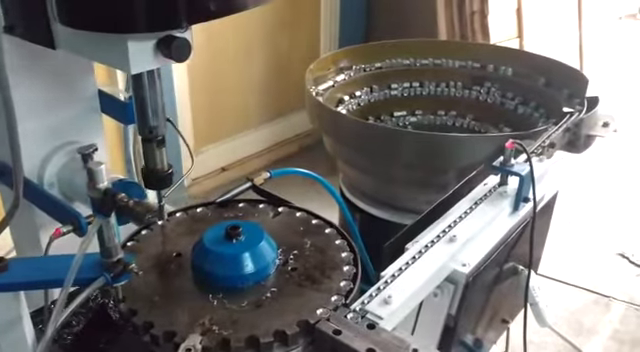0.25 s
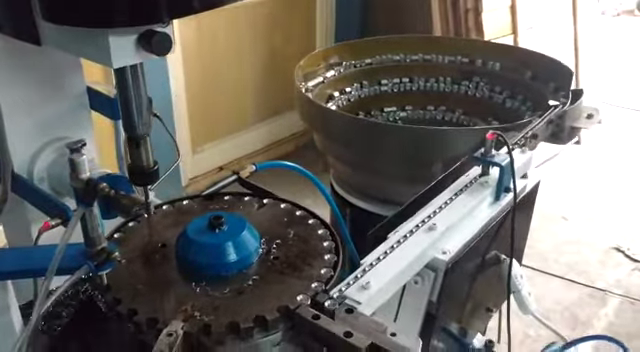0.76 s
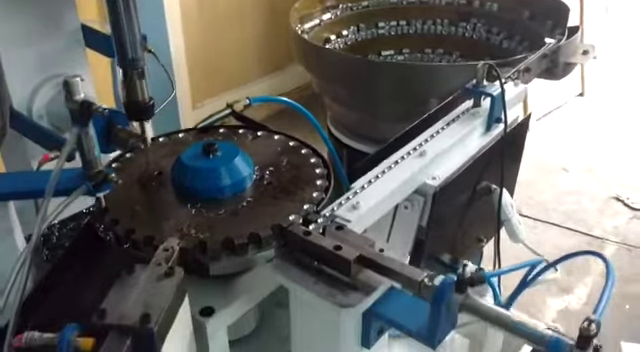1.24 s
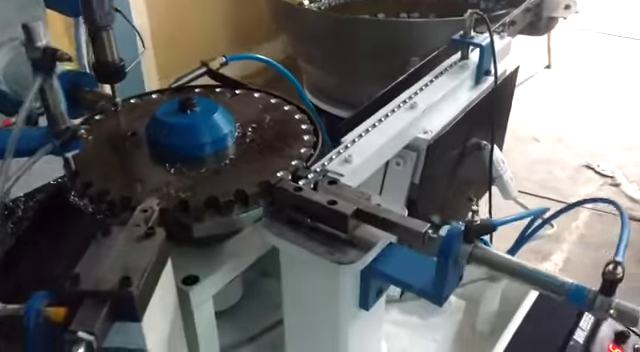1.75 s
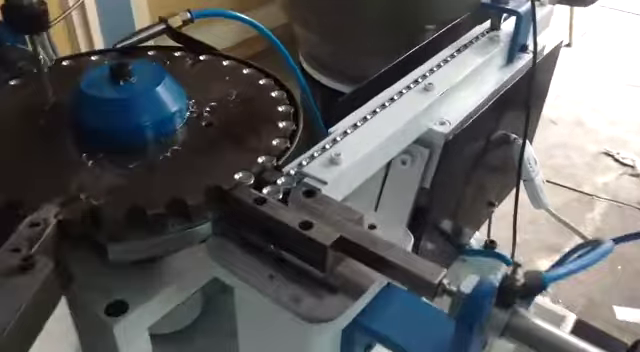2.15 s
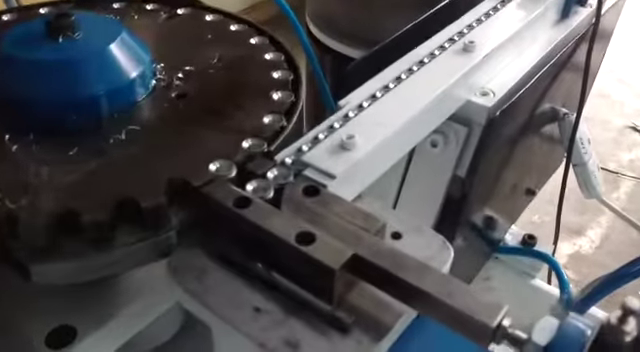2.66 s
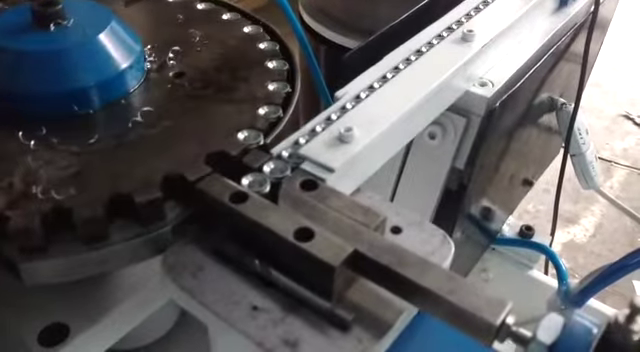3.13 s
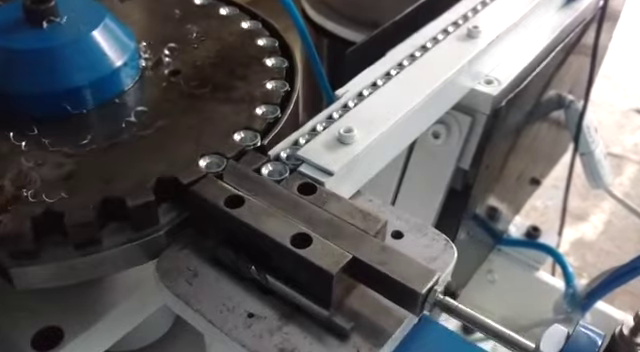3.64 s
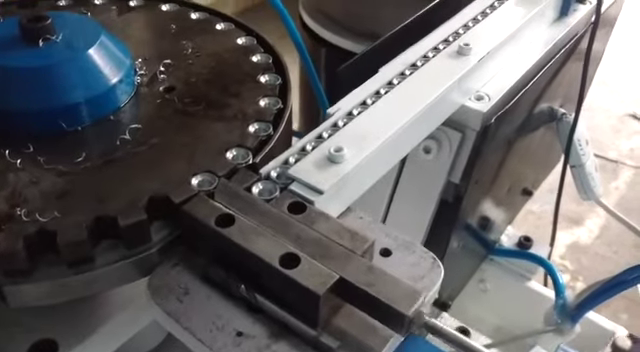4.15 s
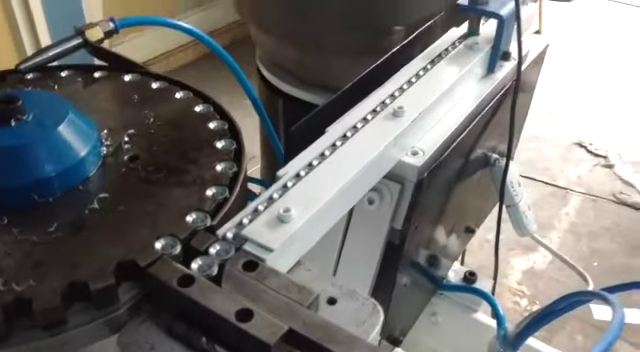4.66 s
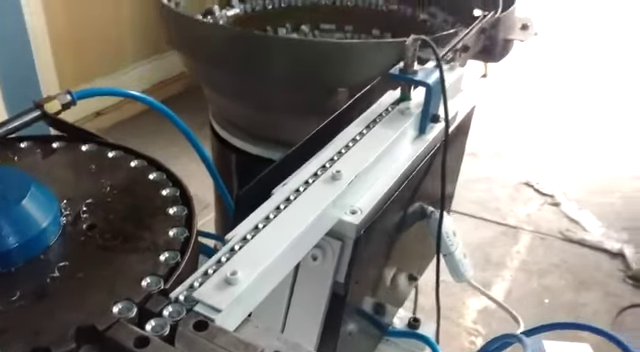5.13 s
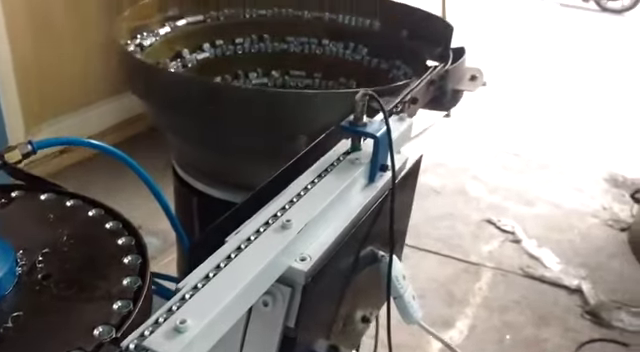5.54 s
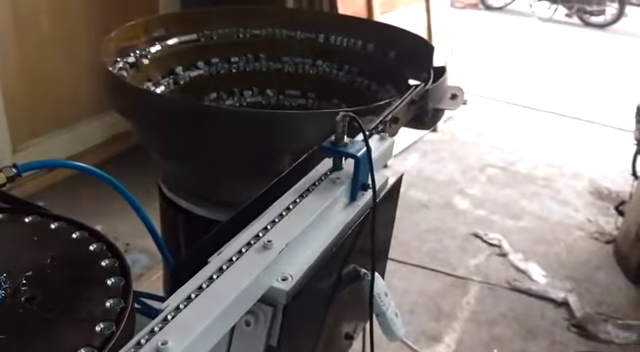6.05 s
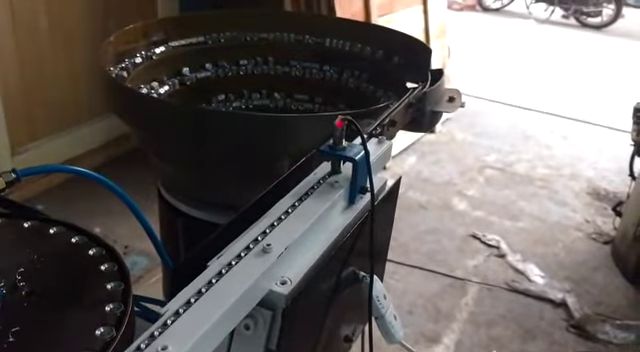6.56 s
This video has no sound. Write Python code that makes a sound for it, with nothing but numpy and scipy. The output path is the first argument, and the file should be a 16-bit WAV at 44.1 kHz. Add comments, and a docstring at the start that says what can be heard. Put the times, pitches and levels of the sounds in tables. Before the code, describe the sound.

Close in a small hard workshop, a drill growls through metal in two swelling passes over a limping belt thump and the bright rattle of tiny steel parts. Each pass ends abruptly with a sharp clack and an air hiss. Between them the index table turns, pneumatic valves spit, slides knock and a locking pin rings briefly.

```python
"""A drill grinds through metal in an automatic machine, over two cycles heard in a workshop from close by.
Broken chips excite its frame; the grinding swells and dies as it lifts. A vibrating bowl feeder hums and
rattles small steel parts: random impacts through resonances. A drive belt thumps in a limping rhythm,
air valves spit shaped noise, the slide and index table clack against stops, and a pin rings in decaying modes."""
import sys
import numpy as np
from scipy import signal
from scipy.fft import rfft, irfft, next_fast_len
from scipy.io import wavfile
from scipy.ndimage import uniform_filter1d, minimum_filter1d, map_coordinates

SR = 44100
rng = np.random.default_rng(int(sys.argv[2]) if len(sys.argv) > 2 else 0)


def waveform_to_disk(signal):
    """Save audio, clipped to [-1, 1], as 16-bit WAV at the path in sys.argv[1]."""
    frames = np.transpose(np.atleast_2d(signal))
    scaled = np.clip(frames, -1, 1) * 32767
    samples = np.round(scaled).astype(np.int16)
    wavfile.write(sys.argv[1], SR, samples)


N = 299880

# Levels in these tables are relative settings; the sources add their own trims.
# The machine at rest, read between rows. Each row: time in s, grinding in dB, rattle in dB.
IDLE = [(0.4, -40.5, -41), (2.85, -38, -37.5), (3.85, -37, -36.5), (4.05, -35, -33.5), (6.35, -37.5, -36)]
# The bit feeds into a part, reaches full load and lifts.
# Each row: start in s, lift in s, time to full load in s, grinding in dB, rattle in dB.
CUTS = [(0.683, 2.451, 1.437, -24.5, -25.5), (4.19, 5.956, 1.073, -26, -25.5)]
# The table is pushed round to its next stop.
# Each row: start in s, stop in s, time to full speed in s, grinding in dB, rattle in dB.
TURNS = [(-0.5, 0.115, 0.4, -32, -32), (2.997, 3.615, 0.73, -31.5, -30), (6.486, 7.115, 0.61, -29, -29.5)]
# Every stroke eases in, swells steadily and dies fast; the rattle is full a little before the grinding.
EASE_S, RATTLE_LEAD_S = 0.12, 0.1
SWELL_DB_PER_S, GRIND_FALL_DB_PER_S, RATTLE_FALL_DB_PER_S = 12, 800, 85
CYCLE_S = 3.5
# In the second cycle the timed vents and stops are louder, and more so in their sizzle and knocks.
SECOND_CYCLE_DB, SECOND_CYCLE_COLOUR_DB = 1.5, 2

# Colour of the rattling parts. Each row: frequency in Hz, gain in dB.
RATTLE_COLOUR = [(300, -25), (1500, -19.5), (2400, -11.5), (3100, -3), (3900, 1), (5000, -0.5), (6300, -3),
                 (7800, -7.5), (11000, -12.5), (13000, -16), (15000, -36)]
# Resonances of the small parts. Each row: frequency in Hz, width in Hz, gain in dB.
PART_MODES = [(3100, 8.4, -3.5), (3534, 48, -3), (3890, 18, -1.5), (4020, 18, -9), (6160, 50, -12)]
# Colour of the cut. Each row: frequency in Hz, gain in dB.
GRIND_COLOUR = [(25, -54), (60, -38), (100, -24.5), (170, -10), (270, -11), (380, -2), (480, -5), (700, -1),
                (1300, 0), (1900, -2), (2400, -7), (5000, -11), (12000, -71)]
# Colour of the low growl under the cut. Each row: frequency in Hz, gain in dB.
GROWL_COLOUR = [(25, -62), (70, -14), (130, -9), (200, -8), (270, -1), (380, -3.5), (500, 2), (800, -4.5),
                (2000, -53)]
# Resonances of the machine frame. Each row: frequency in Hz, width in Hz, gain in dB.
FRAME_MODES = [(281, 34, 3.5), (348.6, 11, 2), (413.2, 6.1, 4), (726, 27, -8.5), (1255, 42, -20),
               (1745, 25, -9)]
# Hum of the drill motor, relative to the grinding. Each row: frequency in Hz, level in dB.
MOTOR_HUM = [(150, -28.5), (291, -17.5), (414.5, -14.5), (528, -18.5), (550, -18.5), (600, -22),
             (649, -16.5), (729, -29.5)]
# Hum of the feeder magnet, whatever the load. Each row: frequency in Hz, mean level in dB.
MAGNET_HUM = [(50, -68), (100, -72), (150, -62.5), (200, -63), (350, -49), (550, -58.5), (600, -55)]
BELT_TURN_S = 0.16038
# Uneven spots of the drive belt meet the pulley once a turn.
# Each row: thump's peak in s into the turn, level over the grinding in dB, length in s.
BELT_SPOTS = [(0.015, -9.5, 0.014), (0.037, 2, 0.022), (0.068, -6.5, 0.018), (0.086, -5, 0.014),
              (0.111, -1, 0.021)]
# Modes of the housing in a belt thump. Each row: nominal frequency in Hz, level in dB.
HOUSING_MODES = [(135, -21.5), (295, -9), (392, 1.5), (560, -7.5)]

# Air valves venting in every cycle.
# Each row: time into the cycle in s, level in dB, sizzle in dB, t60 in s, opening time constant in s.
VENTS = [(0.114, -11, -17, 0.28, 0.0087), (0.716, -13, -18.5, 0.29, 0.0095),
         (2.719, -20.5, -13, 0.38, 0.0019), (3.315, -14, -17, 0.18, 0.01)]
# The exhaust that lifts the drill. One row: sizzle in dB, t60 in s, opening time constant in s.
LIFT_VENT = (-21, 0.48, 0.27)
# Strength of that exhaust. Each entry: level in dB, one for each cut.
LIFT_VENT_LEVELS = [-6.5, -4]
# Colour of the air jets. Each row: frequency in Hz, gain in dB.
AIR_COLOUR = [(30, -58), (150, -11), (400, -7), (2200, -5), (3200, -1.5), (4500, 7), (6200, 5), (7500, 2),
              (9500, -6), (12000, -16), (15000, -16)]
# Colour of the jets' high sizzle. Each row: frequency in Hz, gain in dB.
SIZZLE_COLOUR = [(3000, -42), (7000, -5), (10500, 9), (13000, 4), (15200, -16)]

# Dull knocks of the slide and the pawl.
# Each row: time in s, level in dB, pitch in Hz, second mode in Hz, second mode in dB, t60 in s.
KNOCKS = [(0.117, -20.5, 1170, 428, -2, 0.042), (0.249, -26, 1690, 890, -4, 0.11),
          (0.721, -25.5, 738, 1120, -13, 0.09), (3.002, -24.5, 970, 1644, -3.5, 0.087),
          (3.619, -14, 1566, 1250, -16, 0.04), (3.694, -25, 1111, 1860, -14, 0.11),
          (3.746, -31.5, 926, 685, 3.5, 0.33), (4.281, -18.5, 874, 1510, -17, 0.054),
          (6.497, -29.5, 1017, 1446, -2, 0.17)]
# Steel stops met in every cycle.
# Each row: time into the cycle in s, level in dB, knock in dB, bright in dB, ring in Hz, ring in dB.
CLACKS = [(0.118, -11, -14.5, -16, 6200, -11), (0.191, -16, -29, 3.5, 3380, -10.5),
          (0.721, -20.5, -9.5, -19, 5770, 0), (0.785, -19.5, -11, 0, 5960, -11),
          (2.722, -16.5, -10.5, 8, 5810, -12.5)]
# The drill hits its stop as it lifts. One row: level, knock, bright in dB, ring in Hz, ring in dB.
LIFT_CLACK = (-6.5, -36, -9, 6300, -13.5)
# The pawl knocks as a turn starts. One row: level, knock, bright in dB, ring in Hz, ring in dB.
PAWL_CLACK = (-21.5, -3, -20, 4150, -9)
# Colour of the pin's clack. One row: knock in dB, bright in dB, ring in Hz, ring in dB.
LOCK_CLACK = (-27, 4, 3680, -13)
# Loose parts jolt in the track. Each row: time in s, level in dB, knock in dB, ring in Hz.
JOLTS = [(0.247, -25, -9, 3550), (0.554, -30, -21, 4130), (2.559, -15.5, -23, 5960),
         (3.414, -16, -14, 3860), (3.423, -23, -20, 3900), (3.745, -18, -2.5, 3800),
         (3.991, -23, -32, 4180), (4.058, -24, -30, 3900), (4.086, -24.5, -30, 4000),
         (4.499, -21.5, -25, 6400), (4.957, -21, -23, 6430), (5.585, -15.5, -72, 3970),
         (5.932, -16, -18, 6200), (5.968, -9, -40, 3900), (5.992, -20, -34, 6000), (6.03, -18.5, -31, 3940),
         (6.058, -27, -33, 6020), (6.065, -18.5, -32, 6100)]
JOLT_BRIGHT_DB, JOLT_RING_DB = 2, -7.5
# Colour of a blow's thud in the frame. Each row: frequency in Hz, gain in dB.
KNOCK_COLOUR = [(25, -65), (60, -44), (250, 9.5), (600, 13), (1000, 9), (1700, 8.5), (2500, 14.5),
                (6000, -65)]
# Colour of a blow's clink. Each row: frequency in Hz, gain in dB.
CLINK_COLOUR = [(1000, -9), (2500, 23.5), (3400, -42), (4400, 23), (5500, 17.5), (9000, -6), (15000, -24)]
# Colour of a blow's bright tick and of a valve's leak. Each row: frequency in Hz, gain in dB.
BRIGHT_COLOUR = [(3000, -46), (5000, 1), (6100, 2), (7500, 3), (9500, -9), (15000, -15)]

# The bit squeals at the bottom of each hole. Each row: start in s, end in s, level in dB.
SQUEALS = [(2.128, 2.4, -39), (5.71, 5.89, -39)]
# The bit snatches as it breaks through. Each row: time in s, level in dB.
SNATCHES = [(2.262, -13), (2.32, -16), (2.347, -21), (2.369, -9.5), (2.384, -11), (2.396, -17),
            (2.441, -34), (5.81, -19), (5.847, -16), (5.892, -19), (5.936, -30)]
# The table's locking pin seats.
# Each row: time in s, ring in dB, clack in dB, frequency about which modes are struck hardest in Hz.
LOCKS = [(3.089, -24, -17.5, 3618), (6.606, -27, -20, 3880)]
# Modes of the pin. Each row: frequency in Hz, level in dB, t60 in s.
PIN_MODES = [(672, -13, 0.72), (1040, 1.5, 0.22), (1780, -8, 0.41), (1830, -5, 0.29), (3600, 3.5, .085),
             (3910, -2, 0.12), (4150, 1, 0.13), (4240, 3, 0.11), (5460, -11, .12)]
# Drone of the index table. Each row: frequency in Hz, level in dB.
BEARING_TONES = [(552, -9), (673, -2.5), (1263, -8)]
DRONE_DB, DRONE_FADE_S = -42.5, 0.04

# Decay of the workshop. Each row: frequency in Hz, t60 in s.
WORKSHOP_DECAY = [(150, 0.087), (1000, 0.17), (5000, 0.22), (14000, 0.073)]
# Likeness of the two sides of a wide source. Each row: frequency in Hz, correlation.
ALIKE = [(500, 0.61), (2000, 1), (4400, 0.98), (6000, 0.94), (7500, 0.36), (14000, 0.73)]
# Phase between the stereo channels. Each row: frequency in Hz, phase in half turns.
TWIST = [(1290, 0), (2440, -1), (2530, -1), (3730, -2), (5000, -3), (6300, -4), (7600, -5), (8900, -4),
         (10050, -3), (11200, -2), (12550, -1), (13800, 0), (15500, 1)]
# Spill of the difference between the sides. Each row: frequency in Hz, gain in dB.
SPILL = [(50, 3), (130, -1), (400, -3), (800, -8), (1050, -15), (1260, -34), (1700, -12), (2500, -24),
         (3100, -12), (3730, -20), (4900, -12), (6300, -11), (7600, -11), (8900, -23), (11200, -22),
         (12500, -9), (13800, -6)]
# Left against right. Each row: frequency in Hz, level difference in dB.
LEAN = [(60, -2), (130, 1.5), (280, 0), (400, -5), (600, -0.5), (1300, -0.5), (2400, 1.5), (4400, -3),
        (8100, -0.5), (13000, 2)]
# Bands whose shared part is cancelled. Each row: centre in Hz, half width in Hz, share cancelled.
HOLLOWS = [(2480, 310, 1), (10050, 170, 0.8)]
LOW_CUT_HZ, TOP_HZ = 79, 15600
CEILING_DB, LIMIT_HOLD_S = -1, 0.004


def amp(db):
    """The decibel law: 20 dB is a factor of ten in amplitude."""
    return 10 ** (np.asarray(db) / 20)


def unit(x):
    """Power normalisation: x at rms 1."""
    return x / np.sqrt(np.mean(x ** 2) + 1e-20)


def along(points, hz):
    """Logarithmic pitch scale: (Hz, value) points are read on a log axis."""
    f, v = np.transpose(points)
    return np.interp(np.log(hz + 1), np.log(f + 1), v)


def curves(rows):
    """Linear interpolation: one value per sample for each column after the time."""
    s, *cols = np.transpose(rows)
    return [np.interp(np.arange(N) / SR, s, c) for c in cols]


def wobble(rate):
    """Slow random modulation: a smooth curve through rate random knots a second."""
    knots = rng.standard_normal(int(N * rate / SR) + 4)
    return map_coordinates(knots, [np.arange(N) * rate / SR])


def filtered(x, response):
    """Linear filtering: the spectrum of x times a complex response of frequency."""
    n = x.shape[-1]
    m = next_fast_len(n + SR // 4)
    return irfft(rfft(x, m) * response(np.fft.rfftfreq(m, 1 / SR)), m)[..., :n]


def coloured(x, spectrum, modes=()):
    """Source and resonator: x through a broad colour and narrow resonances, at rms 1."""
    def response(f):
        gain = 1
        for centre, width, db in modes:
            damping = 1j * f * width
            gain = gain + amp(db) * damping / (centre * centre - f * f + damping)
        return amp(along(spectrum, f)) * gain
    return unit(filtered(x, response))


def hiss(spectrum, size, modes=()):
    """Turbulent or impact noise: coloured noise of rms 1."""
    return coloured(rng.standard_normal(size), spectrum, modes)


def band(size, hz, width_hz):
    """Narrow-band excitation: noise of rms 1 with a Gaussian response about hz."""
    return unit(filtered(rng.standard_normal(size), lambda f: np.exp(-((f - hz) / width_hz) ** 2)))


def tone(t, hz, waver, rate):
    """Phase modulation: a sine whose phase strays by about waver radians, with rate knots a second."""
    return np.sin(2 * np.pi * hz * t + waver * wobble(rate)[:len(t)])


def impacts(rate, spread_db):
    """Random impulse train: tiny blows, rate a second, of log-normal size and either sign."""
    struck = rng.random(N) < rate / SR
    return struck * rng.choice([-1, 1], N) * amp(spread_db * rng.standard_normal(N))


def add(track, s, sound):
    """Superposition: a sound is summed into the track at time s."""
    start = max(round(s * SR), 0)
    track[start:start + len(sound)] += sound[:len(track) - start]


def gate(start, end, fade):
    """Linear envelope: 1 between start and end, with straight fades inside."""
    t = np.arange(N) / SR
    return np.clip(np.minimum(t - start, end - t) / fade, 0, 1)


def stroke(start, end, ramp, fall_db_per_s):
    """Exponential growth and decay: a stroke eases in, swells to full load, holds and dies."""
    t = np.arange(N) / SR
    ease = np.clip((t - start) / EASE_S, 0, 1)
    below_full_db = SWELL_DB_PER_S * np.maximum(start + ramp - t, 0)
    fallen_db = fall_db_per_s * np.maximum(t - end, 0)
    return ease * amp(-below_full_db - fallen_db)


def work():
    """Addition of powers: grinding and rattle in dB from the idling machine, cuts and turns."""
    grind, rattle = amp(curves(IDLE)) ** 2
    for start, end, ramp, grind_db, rattle_db in [*CUTS, *TURNS]:
        grind_stroke = stroke(start, end, ramp, GRIND_FALL_DB_PER_S)
        rattle_stroke = stroke(start, end, ramp - RATTLE_LEAD_S, RATTLE_FALL_DB_PER_S)
        grind = grind + (amp(grind_db) * grind_stroke) ** 2
        rattle = rattle + (amp(rattle_db) * rattle_stroke) ** 2
    return 10 * np.log10([grind, rattle])


def each_cycle(steps):
    """Periodic operation: the given timed steps in both cycles, louder in the second one."""
    played = [(s + k * CYCLE_S, db + k * SECOND_CYCLE_DB, colour_db + k * SECOND_CYCLE_COLOUR_DB, *rest)
              for k in range(2) for s, db, colour_db, *rest in steps]
    return [step for step in played if step[0] < N / SR]


def feeder(bunch_db=-1.5, gain_db=3.5):
    """Random excitation of resonators: tossed parts land in bunches and clink."""
    rattle_db = work()[1]
    bunched = unit(impacts(2200, spread_db=1.5) * amp(bunch_db * wobble(160)))
    landings = bunched + amp(1.0) * rng.standard_normal(N)
    return amp(rattle_db + gain_db + 0.43 * wobble(24)) * coloured(landings, RATTLE_COLOUR, PART_MODES)


def drill(gain_db=-0.34, chatter_db=0.5, growl_db=-9.0, lump_db=2.0):
    """Forced vibration: chips break at the edge and a lumpy grab shakes the frame's resonances."""
    grab = wobble(90)
    chips = unit(impacts(1200, spread_db=0.5)) + amp(1.5) * rng.standard_normal(N)
    cut = coloured(chips * amp(chatter_db * grab), GRIND_COLOUR, FRAME_MODES)
    lumps = rng.standard_normal(N) * amp(lump_db * grab + wobble(25))
    growl = coloured(lumps, GROWL_COLOUR, FRAME_MODES)
    return amp(work()[0] + gain_db) * (cut + amp(growl_db) * growl)


def motor(waver=1.0):
    """Tonal machine noise: unsteady partials of the drill motor, louder under load."""
    t = np.arange(N) / SR
    return amp(work()[0]) * sum(amp(db) * tone(t, hz, waver, rate=9) for hz, db in MOTOR_HUM)


def magnet(drift_db=1.5):
    """Mains harmonics: the feeder magnet hums on exact multiples, each slowly drifting in level."""
    t = np.arange(N) / SR
    return sum(amp(db + drift_db * wobble(1.5)) * np.sin(2 * np.pi * hz * t) for hz, db in MAGNET_HUM)


def belt(scatter_db=2.0, detune=0.0053, recede_db_per_s=0.26):
    """Periodic excitation: uneven spots thump the housing each turn, louder with load, slowly fading."""
    out = np.zeros(N + SR)
    for turn in np.arange(0, N / SR, BELT_TURN_S):
        for s, db, length in BELT_SPOTS:
            t = np.arange(round(length * SR)) / SR - length / 2
            thump = sum(amp(level) * np.cos(2 * np.pi * hz * (1 + detune * rng.normal()) * t)
                        for hz, level in HOUSING_MODES)
            size = amp(db + scatter_db * rng.normal() - recede_db_per_s * turn)
            window = np.cos(np.pi * t / length) ** 2
            add(out, turn + s - length / 2, size * window * thump)
    return out[:N] * amp(work()[0])


def valves(air_db=-1, sputter_db=2.2, surge_db=2.0, leak_db=-12, leak_s=0.0091,
           sizzle_hold=0.034, sizzle_rise=0.0045, whistle_db=-23, whistle_hz=8900,
           whistle_width_hz=1200, whistle_t60=0.61, whistle_rise=0.014):
    """Jet turbulence: a valve leaks, opens and spits as the cylinder empties; the lift port whistles."""
    out, t = np.zeros(N), np.arange(SR // 2) / SR
    lifts = [(cut[1], db, *LIFT_VENT) for cut, db in zip(CUTS, LIFT_VENT_LEVELS)]
    for s, db, sizzle_db, t60, opening in each_cycle(VENTS) + lifts:
        sizzle_decay = amp(sizzle_db - 60 * np.maximum(t - sizzle_hold, 0) / t60)
        sizzle = sizzle_decay * hiss(SIZZLE_COLOUR, len(t))
        spits = unit(impacts(700, spread_db=0.5)[:len(t)])
        air = coloured(rng.standard_normal(len(t)) + spits, AIR_COLOUR)
        jet = amp(-60 * t / t60) * air + (1 - np.exp(-t / sizzle_rise)) * sizzle
        add(out, s, amp(db + air_db) * (1 - np.exp(-t / opening)) * jet)
        # the leak rises and falls in a triangle that peaks as the valve opens
        leak = np.maximum(1 - abs(t / leak_s - 1), 0) * hiss(BRIGHT_COLOUR, len(t))
        add(out, s - leak_s, amp(db + leak_db) * leak)
    for s, *_ in lifts:
        whistle = amp(whistle_db - 60 * t / whistle_t60) * band(len(t), whistle_hz, whistle_width_hz)
        add(out, s, (1 - np.exp(-t / whistle_rise)) * whistle)
    return out * amp(sputter_db * wobble(130) + surge_db * wobble(45))


def knocks(body_db=-3.5, rise=0.0012, waver=1.6):
    """Damped modal vibration: heavy parts bump in two unsteady modes over a dull thud."""
    out, t = np.zeros(N), np.arange(SR // 4) / SR
    for s, db, hz, second_hz, second_db, t60 in KNOCKS:
        ring = tone(t, hz, waver, rate=178) + amp(second_db) * tone(t, second_hz, waver, rate=126)
        thud = amp(body_db) * hiss(KNOCK_COLOUR, len(t))
        add(out, s, amp(db - 60 * t / t60) * (1 - np.exp(-t / rise)) * (ring + thud))
    return out


def contacts():
    """Impact sources: the cycle's stops, the lift, the pawl, the pin and the loose parts."""
    return (each_cycle(CLACKS)
            + [(cut[1], *LIFT_CLACK) for cut in CUTS]
            + [(turn[0], *PAWL_CLACK) for turn in TURNS if turn[0] > 0]
            + [(s, db, *LOCK_CLACK) for s, _, db, _ in LOCKS]
            + [(s, db, knock_db, JOLT_BRIGHT_DB, hz, JOLT_RING_DB) for s, db, knock_db, hz in JOLTS])


def clacks(knock_t60=0.11, clink_t60=0.027, bright_t60=0.053, ring_t60=0.15, ring_width_hz=260,
           rise=0.00058):
    """Impact radiation: steel blows excite a frame knock, a clink, a bright tick and a narrow ring."""
    out, t = np.zeros(N), np.arange(SR // 4) / SR
    for s, db, knock_db, bright_db, ring_hz, ring_db in contacts():
        knock = amp(knock_db - 4.5 - 60 * t / knock_t60) * hiss(KNOCK_COLOUR, len(t))
        clink = amp(2.5 - 60 * t / clink_t60) * hiss(CLINK_COLOUR, len(t), PART_MODES)
        tick = amp(bright_db - 5.0 - 60 * t / bright_t60) * hiss(BRIGHT_COLOUR, len(t), PART_MODES)
        ring = amp(ring_db - 60 * t / ring_t60) * band(len(t), ring_hz, ring_width_hz)
        add(out, s, amp(db) * (1 - np.exp(-t / rise)) * (knock + clink + tick + ring))
    return out


def squeal(centre_hz=13150, width_hz=150, fade=0.054):
    """Narrow-band friction noise: a thin, rough whistle of the bit at full depth."""
    level = sum(amp(db) * gate(start, end, fade) for start, end, db in SQUEALS)
    return level * band(N, centre_hz, width_hz)


def snatches(t60=0.049, rise=0.0048, centre_hz=1100, width_hz=850):
    """Sudden release: the bit catches and tears free in short, decaying noise crunches."""
    out, t = np.zeros(N), np.arange(SR // 8) / SR
    for s, db in SNATCHES:
        crunch = band(len(t), centre_hz, width_hz)
        add(out, s, amp(db - 60 * t / t60) * (1 - np.exp(-t / rise)) * crunch)
    return out


def pin(rise=0.0014, struck_db=7, struck_width_hz=150, waver=0.35):
    """Modal excitation: the pin rings in decaying modes, and where it lands decides which high one leads."""
    out, t = np.zeros(N), np.arange(SR // 2) / SR
    for s, db, _, struck_hz in LOCKS:
        for hz, level, t60 in PIN_MODES:
            lead_db = struck_db * np.exp(-((hz - struck_hz) / struck_width_hz) ** 2)
            envelope = amp(db + level + lead_db - 60 * t / t60) * (1 - np.exp(-t / rise))
            add(out, s, envelope * tone(t, hz, waver, rate=110))
    return out


def table(length=0.82):
    """Wavering tones: the index table drones faintly for a while after the pin has dropped."""
    t = np.arange(N) / SR
    level = amp(DRONE_DB) * sum(gate(s, s + length, DRONE_FADE_S) for s, *_ in LOCKS)
    return level * sum(amp(db + 3.1 * wobble(12)) * np.sin(2 * np.pi * hz * t + 0.84 * wobble(13))
                       for hz, db in BEARING_TONES)


def spread(source):
    """Interchannel correlation: one part reaches both sides alike, another as opposites."""
    def alike(f):
        return np.clip(along(ALIKE, f), 0, 1)
    shared = filtered(source(), lambda f: np.sqrt((1 + alike(f)) / 2))
    apart = filtered(source(), lambda f: np.sqrt((1 - alike(f)) / 2))
    return np.array([shared + apart, shared - apart])


def workshop(x, wet_db):
    """Reverberation: direct sound plus unrelated decaying echoes per side, new every quarter second."""
    x = np.broadcast_to(x, (2, N))
    echo, step = np.zeros((2, N)), SR // 4
    for start in range(0, N, step):
        hz, t, z = signal.stft(rng.standard_normal((2, SR // 3)), SR, nperseg=256)
        decay = amp(-60 * t / along(WORKSHOP_DECAY, hz)[:, None])
        tails = signal.istft(z * decay, SR, nperseg=256)[1]
        for side, direct, tail in zip(echo, x, tails):
            reflected = signal.fftconvolve(direct[start:start + step], tail / np.linalg.norm(tail))
            add(side, start / SR, reflected)
    return (x + amp(wet_db) * echo) / np.hypot(1, amp(wet_db))


def limited(x):
    """Peak limiting: the gain dips for a moment wherever a peak would pass the ceiling."""
    hold = round(LIMIT_HOLD_S * SR)
    needed = 1 / np.maximum(abs(x).max(axis=0) / amp(CEILING_DB), 1)
    return x * uniform_filter1d(minimum_filter1d(needed, 2 * hold), hold)


def scene():
    """Airborne and structural paths: work and blows echo more than the belt; the magnet stays dry."""
    steady = spread(feeder) + spread(drill) + motor() + snatches() + squeal() + table()
    blows = spread(valves) + clacks() + knocks() + pin()
    echoing = workshop(steady, wet_db=-9.5) + workshop(blows, wet_db=-8.0)
    return echoing + workshop(belt(), wet_db=-11.5) + magnet()


def record(dry):
    """Stereo phase rotation: sum and difference alternate by band; then peaks and both extremes are cut."""
    def angle(f):
        return np.pi / 2 * np.interp(f, *np.transpose(TWIST))
    spill = filtered(dry[0] - dry[1], lambda f: amp(along(SPILL, f)))
    mid = filtered(dry[0], lambda f: np.cos(angle(f))) + filtered(spill, lambda f: np.sin(angle(f)))
    side = (filtered(dry[1], lambda f: 1j * np.sin(angle(f)))
            + filtered(spill, lambda f: 1j * np.cos(angle(f))))
    pair = filtered(np.array([mid + side, mid - side]),
                    lambda f: amp(np.outer([.5, -.5], along(LEAN, f))))
    # in the hollows the part shared in phase is taken away
    common = filtered(pair.mean(axis=0), lambda f: sum(share * np.exp(-((f - hz) / w) ** 4)
                                                       for hz, w, share in HOLLOWS))
    return filtered(limited(pair - common),
                    lambda f: (f < TOP_HZ) * f ** 2 / np.hypot(f ** 2, LOW_CUT_HZ ** 2))


dry = scene()
out = record(dry)
waveform_to_disk(out)
```